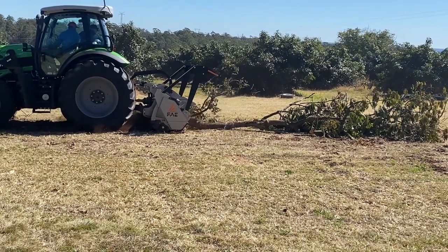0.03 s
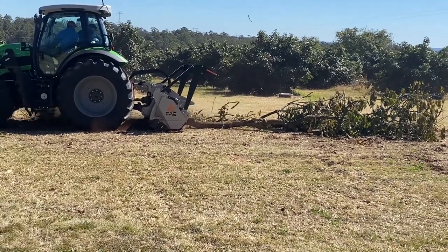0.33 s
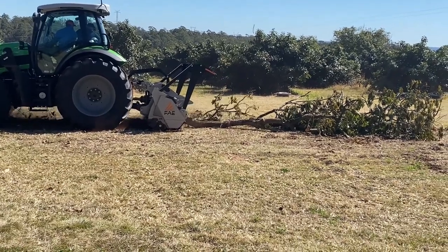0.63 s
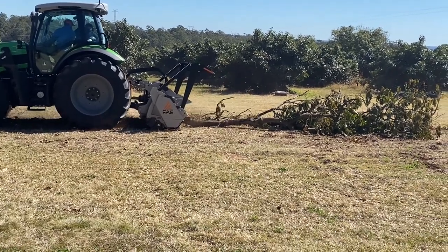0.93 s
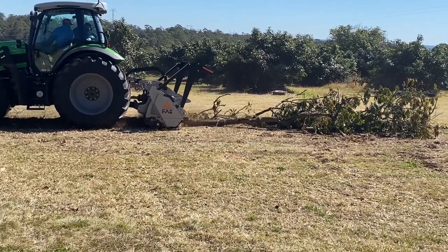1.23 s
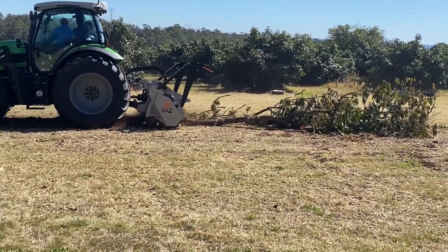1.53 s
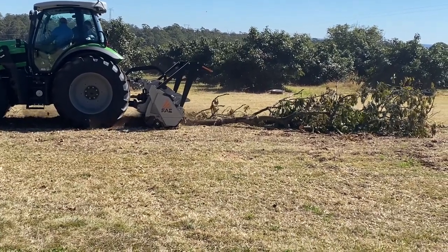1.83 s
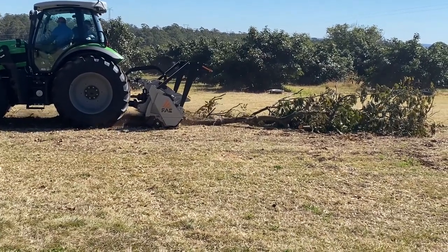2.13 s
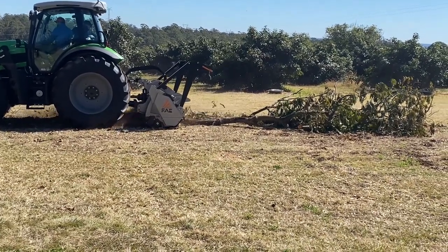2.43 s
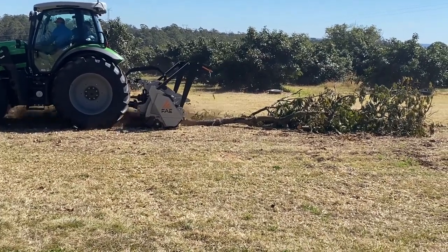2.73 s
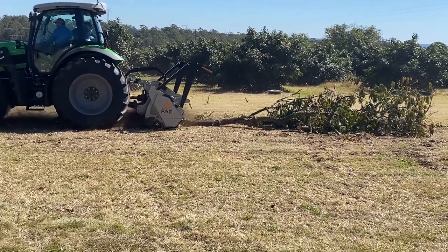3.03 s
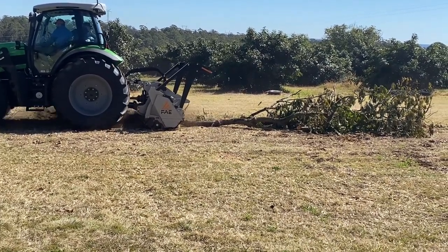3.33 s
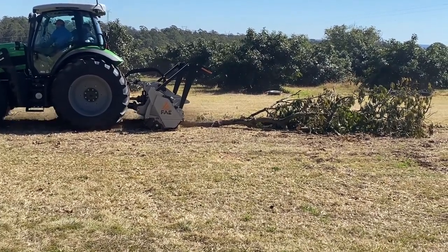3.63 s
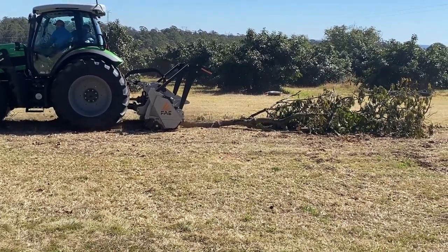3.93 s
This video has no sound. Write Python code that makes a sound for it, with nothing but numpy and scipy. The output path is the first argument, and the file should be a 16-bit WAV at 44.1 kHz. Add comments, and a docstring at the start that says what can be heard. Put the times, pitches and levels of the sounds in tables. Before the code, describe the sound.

A mulcher roars through branches behind a droning diesel tractor, heard from a distance across a field. Sticks crack and thick wood thumps against steel as the engine labours, then the splintering eases, with faint high squeaks on top.

```python
"""A low drone and a rough roar, some way off: a tractor drags a forestry mulcher over branches in a field.
The six-cylinder diesel sags under load and its firing note swells; the belt-driven rotor drones just
above the firing rate and beats against it. Its teeth shred wood in rapid bites, the steel hood roars,
sticks crack and thick pieces thump. A faint turbo whistle and thin squeaks sit on top."""
import sys
import numpy as np
from scipy import signal
from scipy.fft import rfft, irfft, next_fast_len
from scipy.io import wavfile
from scipy.ndimage import map_coordinates

SR = 44100
rng = np.random.default_rng(int(sys.argv[2]) if len(sys.argv) > 2 else 0)


def generate_wav(sig):
    """Save sig (samples, or channels by samples) to the path in sys.argv[1] as 16-bit PCM at SR."""
    pcm = np.round(np.clip(np.atleast_2d(sig).T, -1, 1) * 32767).astype(np.int16)
    wavfile.write(sys.argv[1], SR, pcm)


N = 176400

# engine firing rate: t/s, f/Hz
FIRING_RATE = [(0, 98.96), (0.33, 100.4), (1, 103.9), (1.33, 103.6), (1.67, 100.6), (2, 98.37),
               (2.33, 95.64), (2.67, 94.07), (3, 94.7), (3.33, 97.7), (3.67, 102.3), (4, 104.3)]
FREE_HZ = 104  # sag is how far the firing rate falls below this
ROTOR_RATIO, SLIP_PER_HZ = .2704, .00022  # rotor turns per firing, and their loss per Hz of sag
# exhaust partials: multiple of crank rate, level/dB, change with sag/(dB per Hz)
EXHAUST_PARTIALS = [(3, -21.5, 0.92), (3.5, -34, 0), (4.5, -22.5, -1.13), (5, -39.5, 1.14),
                    (5.5, -38.5, 0.28), (6, -31, 1.18), (9, -45.5, .5), (12, -52, 0.92)]
# fan whine: multiple of firing rate, level/dB, change with sag/(dB per Hz)
FAN_PARTIALS = [(4.728, -32.5, -.6), (9.366, -48.5, 1.5), (8.684, -51, 1.1), (4.3, -47, 1.3),
                (5.35, -47, 1.2)]
# block and panel resonances: f/Hz, width/Hz, level/dB
BLOCK_MODES = [(1007, 63, -1.5), (1117, 50, 2), (1680, 120, -8.5), (1923, 120, -5.5), (2060, 87, 1.5),
               (2444, 94, -6), (2738, 106, -3.5), (2905, 170, -3), (3610, 440, -11.5), (4870, 880, -10.5)]
CLATTER_DB, CLATTER_DEPTH = -35.5, 0.24
TURBO_HZ, TURBO_WIDTH_HZ, TURBO_DB, TURBO_LAG_S = 8350, 220, -38.5, 0.51

# rotor drone swell, used relative to its peak: t/s, level/dB
DRONE_SWELL = [(0, -26), (.65, -34.5), (1.15, -23.5), (1.4, -16), (1.95, -15.5), (2.45, -18), (2.85, -39),
               (3.35, -43), (3.6, -26), (4, -30)]
# rotor partials: multiple of turning rate, level at full drone/dB, dB per dB of swell
ROTOR_PARTIALS = [(2, -37, .7), (3, -29, 0.7), (4, -13.5, 0.5), (5, -36, 0.1), (6, -34, 1), (7, -31, 1.2),
                  (8, -34, 2), (9, -33, 0.7), (10, -26.5, 1.3), (11, -33, 2.5), (16, -39, 1.6),
                  (17, -34.5, 1), (19, -38.5, 0.5), (20, -35.5, 1.3), (25, -39.5, 1)]
# fader rides for low rumble, hood roar and shredding: t/s, level/dB
RUMBLE_RIDE = [(0, -17), (.15, -22), (1, -25), (1.8, -23.5), (2.35, -20), (2.7, -21.5), (3.3, -22),
               (4, -25)]
ROAR_RIDE = [(0, -25), (.15, -26), (.9, -27.5), (1.35, -22.5), (1.7, -24.5), (1.9, -21), (2.25, -22),
             (2.45, -22.5), (2.8, -24.5), (3.02, -21.5), (3.15, -25), (4, -27.5)]
SHRED_RIDE = [(0, -28.5), (.1, -28), (.2, -34), (.8, -34.5), (1.05, -30.5), (1.35, -26), (1.7, -28),
              (2, -27), (2.22, -27), (2.36, -22.5), (2.48, -22), (2.65, -27), (2.85, -30), (3.02, -29),
              (3.15, -30), (3.5, -32), (4, -32.5)]
# noise colours of rumble, roar, shredding and cracks: f/Hz, level/dB
RUMBLE_EQ = [(20, -24), (35, -14), (50, -8.5), (75, -1), (105, 0), (180, -2.5), (240, -4.5), (330, -24.5),
             (500, -25), (1000, -85)]
ROAR_EQ = [(150, -39), (330, -8), (420, -2), (500, 0), (600, -3), (750, -6), (900, -6), (1100, -6),
           (1450, -12), (2000, -13), (2900, -15), (4000, -22), (8000, -57)]
SHRED_EQ = [(400, -14), (1000, -3), (2000, 0), (2350, -2), (2800, -1.5), (3700, -3), (5000, -3),
            (6500, -5.5), (8000, -8.5), (10000, -11), (12500, -12.5), (15800, -18)]
CRACK_EQ = [(500, -4), (2000, -0.5), (4500, 2), (7000, -5.5), (11000, -10.5), (15800, -21)]
# pulse of the biting teeth: multiple of rotor rate, depth
BITE_PULSES = [(1, 0.042), (2, 0.05), (3, 0.072), (4, 0.14), (6, 0.089)]
CHIPS_PER_S, CHIP_DECAY_S, CHIP_SPREAD, CHIP_DB, HISS_DB = 3500, .0004, 0.45, -4, -1.5
# breaking sticks: t/s, relative level/dB, time to fall 20 dB/s
STICK_CUES = [(0.078, -22, 0.046), (.413, -12.5, .012), (1.082, -19, .01), (1.11, -11.5, 0.038),
              (1.162, -12, .006), (1.41, -12.5, .01), (1.789, -10, .005), (2.365, -8.5, 0.012),
              (2.383, -17, 0.0091), (2.429, -18, 0.0073), (2.434, -10, 0.013), (2.471, -11, .007),
              (2.542, -11, 0.0071), (2.718, -15.5, 0.075), (2.951, -15, 0.054), (3.266, -17.5, 0.051),
              (3.454, -19, .005), (3.843, -9.5, 0.0062), (3.875, -15, .006)]
PING_AT_S, PING_HZ, PING_DB, PING_T60_S = 2.95, 6580, -20, .14
# thick wood hitting the hood: t/s, level/dB, brightness/(dB per octave)
THUMP_CUES = [(.01, -13, 2), (2.095, -12, 1), (2.22, -4, -2), (2.338, -3, -1), (2.9, -13, 3),
              (3.035, -15, 6), (3.58, -16, 0)]
# ring of the steel hood: f/Hz, level/dB, t60/s
HOOD_MODES = [(139, 3, 0.063), (187.5, 1.5, 0.15), (237, -12, 0.13), (281, 0, 0.068), (455, -15.5, 0.13),
              (538, -5, 0.05)]
# thin squeaks: t/s, length/s, level/dB, f/Hz
SQUEAK_CUES = [(.06, 0.097, -39, 12000), (0.196, .07, -38, 12550), (.245, .06, -39, 11900),
               (0.51, .08, -44, 11950), (1.41, .05, -44, 12400), (2.243, .04, -33, 12400),
               (2.43, .1, -33, 12200), (2.578, .15, -37, 11900), (3.01, 0.15, -39, 12300),
               (3.262, .09, -42, 12450), (3.56, 0.057, -41, 12550)]
SQUEAK_WAVER_HZ, SQUEAK_RASP_RAD = 90, 1.1

# stereo phase: f/Hz, lead of left over right/rad
LEFT_LEAD = [(100, -.12), (300, -.05), (400, .17), (580, -.12), (740, 1.2), (850, 1.3), (1000, 0),
             (1250, 1.1), (1480, 1.4), (1600, .35), (2200, .07), (7500, 0), (7650, -.85), (9080, -3.14),
             (10900, -6.28), (11600, -6.35), (11900, -7.35), (13350, -9.42), (14300, -11.1),
             (14800, -12.57)]
# stereo balance: f/Hz, left minus right level/dB
BALANCE = [(100, .3), (200, -.8), (500, 0), (680, -6), (880, 7), (1000, 0), (1150, -2.5), (1480, 4),
           (1800, 0)]
# stereo width of the noise beds: f/Hz, side level/dB
WIDTH = [(100, -14), (500, -18), (850, -9.5), (1100, -9), (1500, -9), (2100, -19), (3300, -48), (4000, -80),
         (7300, -75), (7800, -50), (14500, -24)]
LOW_CUT_HZ, HIGH_CUT_HZ = 30, 15900


def amp(db):
    """Decibels to gain."""
    return 10 ** (np.asarray(db) / 20)


def unit(x):
    """Scale to rms 1."""
    return x / np.sqrt(np.mean(x ** 2) + 1e-20)


def along(points, hz):
    """(f/Hz, value) points read on a log axis."""
    f, v = np.transpose(points)
    return np.interp(np.log(hz + 1), np.log(f + 1), v)


def clock():
    """Time of each sample."""
    return np.arange(N) / SR


def curve(rows):
    """(t/s, value) points as one value per sample."""
    return np.interp(clock(), *np.transpose(rows))


def wobble(rate):
    """A smooth random curve, rate knots a second."""
    return map_coordinates(rng.standard_normal(2000), [clock() * rate + 2], mode="wrap")


def filtered(x, response):
    """x through a frequency response."""
    size = next_fast_len(N + 8192)
    return irfft(rfft(x, size) * response(np.fft.rfftfreq(size, 1 / SR)), size)[..., :N]


def coloured(x, eq):
    """x through an EQ curve, at rms 1."""
    return unit(filtered(x, lambda hz: amp(along(eq, hz))))


def noise(eq):
    """A narrow stereo noise bed: a mid of rms 1 and a quieter, unrelated side."""
    mid, side = coloured(rng.standard_normal((2, N)), eq)
    side = filtered(side, lambda hz: amp(along(WIDTH, hz)))
    return np.array([mid + side, mid - side])


def partial(cycles, flutter_db, jitter_rad, rate):
    """One slightly unsteady sine, rms about 1."""
    flutter = amp(flutter_db * wobble(rate))
    return np.sqrt(2) * flutter * np.sin(2 * np.pi * cycles + jitter_rad * wobble(rate))


def turbo(sag, grow_db):
    """A breathy whistle that follows the load with some lag."""
    boost = np.interp(clock() - TURBO_LAG_S, clock(), sag, left=0) - sag.max()
    band = lambda hz: 1 / (1 + ((hz - TURBO_HZ) / TURBO_WIDTH_HZ) ** 2)
    return amp(TURBO_DB + grow_db * boost) * unit(filtered(rng.standard_normal(N), band))


def squeaks():
    """Thin, very high, raspy squeaks come and go."""
    t = clock()
    waver = np.cumsum(SQUEAK_WAVER_HZ * wobble(60)) / SR
    swell = lambda start, length: np.sin(np.pi * np.clip((t - start) / length, 0, 1))
    tones = sum(amp(db) * swell(start, length) * np.exp(2j * np.pi * hz * t)
                for start, length, db, hz in SQUEAK_CUES)
    flicker = amp(3.2 * wobble(150))
    rasp = SQUEAK_RASP_RAD * wobble(1100)
    return np.sqrt(2) * np.real(tones * flicker * np.exp(2j * np.pi * waver + 1j * rasp))


def clatter(firings):
    """Diesel knock rattles the block and panels once a firing."""
    knock = (1 + CLATTER_DEPTH * np.cos(2 * np.pi * firings)) * rng.standard_normal(N)
    body = lambda hz: sum((-1) ** k * amp(db) * 1j * hz * width / (centre**2 - hz**2 + 1j * hz * width)
                          for k, (centre, width, db) in enumerate(BLOCK_MODES))
    return amp(CLATTER_DB) * unit(filtered(knock, body))


def fan(firings, sag):
    """Fan and drive whine, geared to the engine."""
    return sum(amp(db + grow * sag) * partial(k * firings, flutter_db=2, jitter_rad=.2, rate=14)
               for k, db, grow in FAN_PARTIALS)


def exhaust(firings, sag):
    """The exhaust hums on whole and half multiples of the crank rate; load shifts their balance."""
    crank = firings / 3  # three firings a turn
    return sum(amp(db + grow * sag) * partial(k * crank + .25, flutter_db=.94, jitter_rad=.064, rate=14)
               for k, db, grow in EXHAUST_PARTIALS)


def hood(turns):
    """Debris and air churn under the steel hood: a roar over a low rumble."""
    churn = 1 + 0.091 * np.sin(2 * np.pi * turns)
    roar = amp(curve(ROAR_RIDE) - 0.5 + .8 * wobble(25.11)) * churn * noise(ROAR_EQ)
    return roar + amp(curve(RUMBLE_RIDE)) * noise(RUMBLE_EQ)


def thumps(attack_s):
    """Thick pieces are flung against the hood and ring it; each blow has its own brightness, tilting the ring
    toward its higher or lower modes."""
    out, t = np.zeros(N + SR), np.arange(SR // 2) / SR
    pivot_hz = HOOD_MODES[1][0]
    attack = 1 - np.exp(-t / attack_s)
    for start, db, bright in THUMP_CUES:
        ring = 0
        for hz, mode_db, t60 in HOOD_MODES:
            struck_db = mode_db + bright * np.log2(hz / pivot_hz) + rng.normal(0, 2.4)
            detuned_hz = hz * (1 + rng.normal(0, 0.014))
            ring += amp(struck_db - 60 * t / t60) * np.sin(2 * np.pi * detuned_hz * t)
        out[round(start * SR):][:len(t)] += amp(db) * ring * attack
    return out[:N]


def cracks():
    """Sticks break in short bright bursts; once a tooth pings on something hard."""
    t = clock()
    bursts = sum((t >= start) * amp(db - 6.5 - 20 * np.maximum(t - start, 0) / fall)
                 for start, db, fall in STICK_CUES)
    age = np.maximum(t - PING_AT_S, 0)
    ping = amp(PING_DB - 60 * age / PING_T60_S) * np.sin(2 * np.pi * PING_HZ * age)
    return bursts * coloured(rng.standard_normal(N), CRACK_EQ) + ping


def shredding(turns):
    """Splinters snap in a dense spray that pulses as the rows of teeth bite."""
    bite = np.exp(sum(depth * (1 + 0.74 * wobble(3)) * np.cos(2 * np.pi * k * turns)
                      for k, depth in BITE_PULSES))
    snaps = rng.random(N) < CHIPS_PER_S / SR * bite
    strength = np.exp(CHIP_SPREAD * np.minimum(rng.standard_normal(N), 2.5))
    energy = signal.lfilter([1], [1, -np.exp(-2 / (CHIP_DECAY_S * SR))], (snaps * strength) ** 2)
    chips = coloured(np.sqrt(energy) * rng.standard_normal(N), SHRED_EQ)
    fader = amp(curve(SHRED_RIDE) + 0.9 * wobble(29.967))
    return fader * unit(bite) * (amp(CHIP_DB) * chips + amp(HISS_DB) * noise(SHRED_EQ))


def rotor(turns):
    """The toothed drum drones on multiples of its turning rate; the loudest partial is the steadiest."""
    swell_db = curve(DRONE_SWELL) - curve(DRONE_SWELL).max()
    loudest = max(db for k, db, grow in ROTOR_PARTIALS)
    steady = dict(flutter_db=0.2, jitter_rad=0.093, rate=18)
    rough = dict(flutter_db=2.0, jitter_rad=0.37, rate=12)
    return sum(amp(db + grow * swell_db) * partial(k * turns, **(steady if db == loudest else rough))
               for k, db, grow in ROTOR_PARTIALS)


def scene():
    """Engine speed sets the rotor's pace; the belt slips a little as the load drags the engine down."""
    firing_hz = curve(FIRING_RATE)
    sag = FREE_HZ - firing_hz
    firings = np.cumsum(firing_hz) / SR
    turns = np.cumsum(firing_hz * (ROTOR_RATIO - SLIP_PER_HZ * sag)) / SR
    tractor = exhaust(firings, sag) + fan(firings, sag) + clatter(firings) + turbo(sag, grow_db=2.5)
    mulcher = rotor(turns) + hood(turns) + shredding(turns) + cracks()
    mulcher += thumps(attack_s=0.0073) + squeaks()
    return -(tractor + mulcher)


def record(dry):
    """Two microphones, apart in phase and level by frequency; then low cut, soft clip and high cut."""
    sides = np.array([[1], [-1]])
    pair = lambda hz: amp(sides * along(BALANCE, hz) / 2) * np.exp(1j * sides * along(LEFT_LEAD, hz) / 2)
    x = filtered(dry, lambda hz: pair(hz) * hz ** 3 / (hz ** 3 + LOW_CUT_HZ ** 3))
    rounded = x / (1 + np.abs(x / .95) ** 10) ** (1 / 10)
    return filtered(rounded, lambda hz: hz < HIGH_CUT_HZ)


dry = scene()
out = record(dry)
generate_wav(out)
```